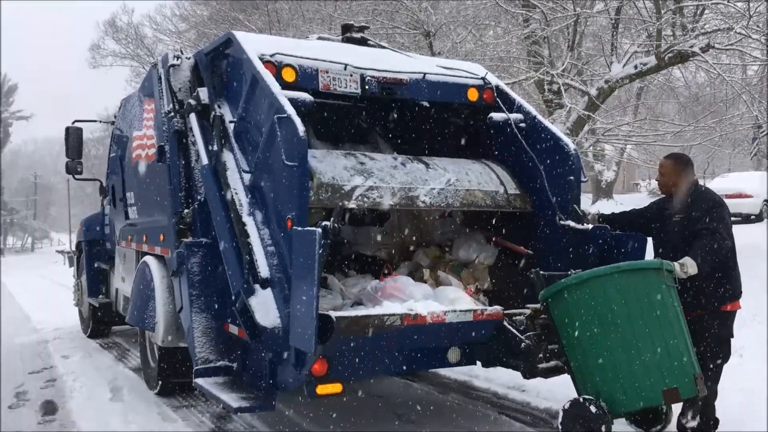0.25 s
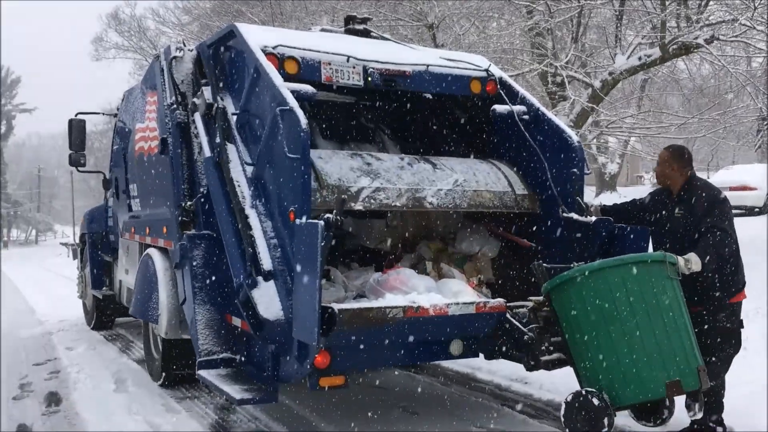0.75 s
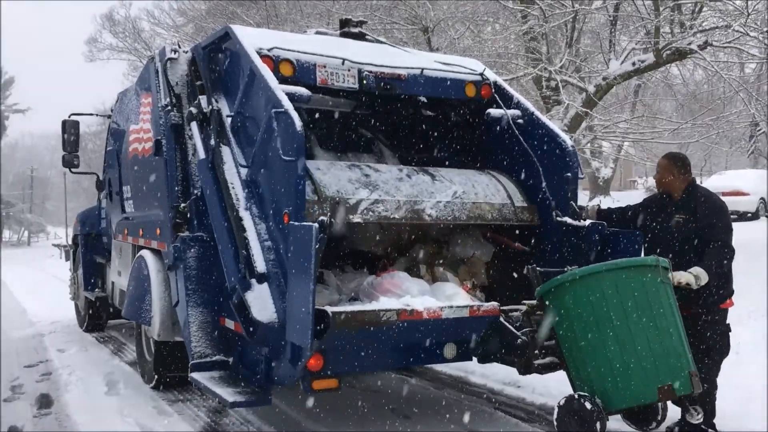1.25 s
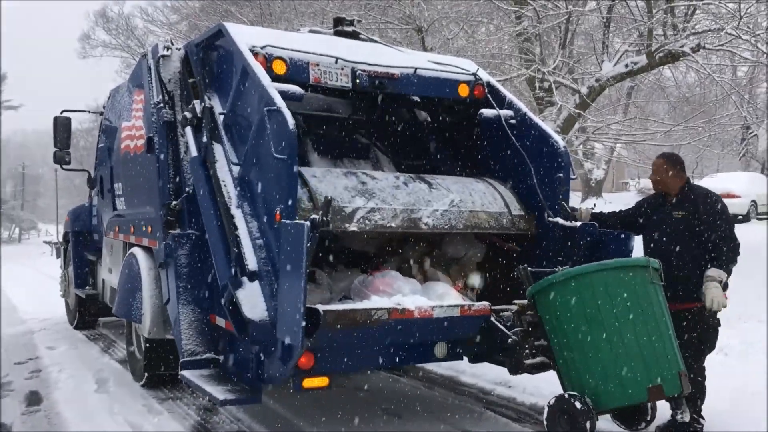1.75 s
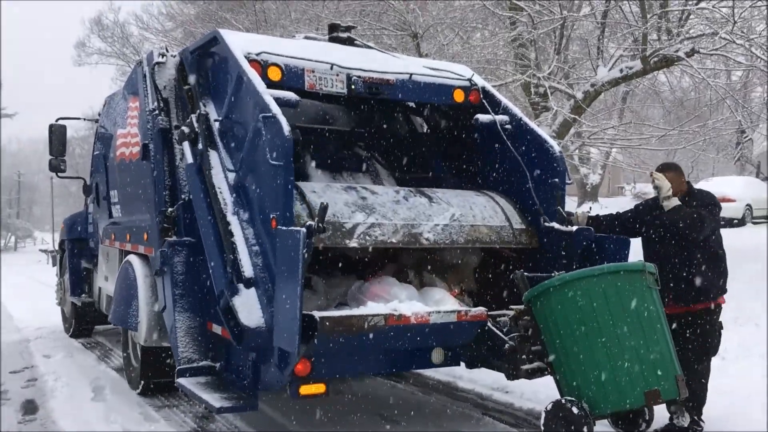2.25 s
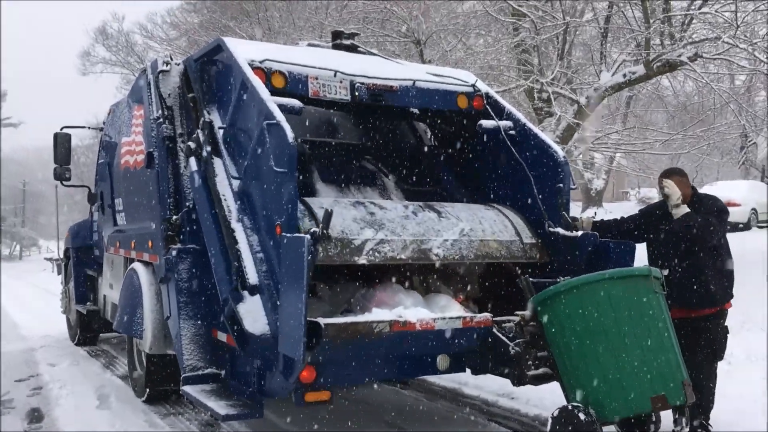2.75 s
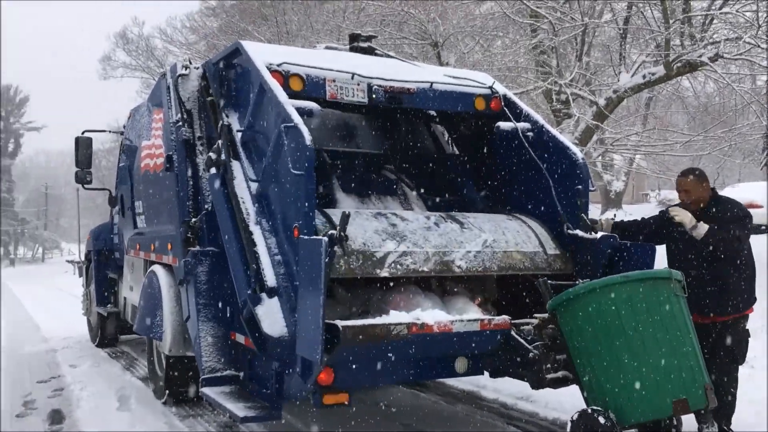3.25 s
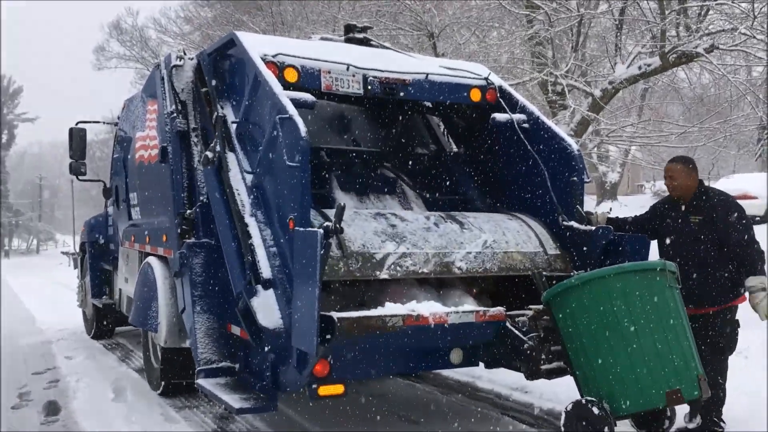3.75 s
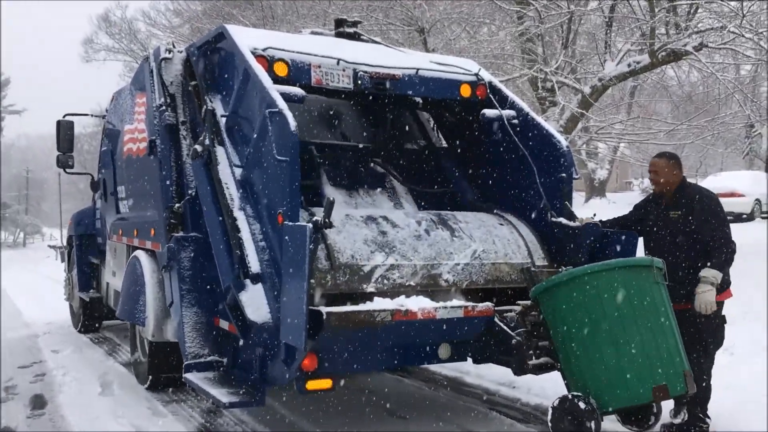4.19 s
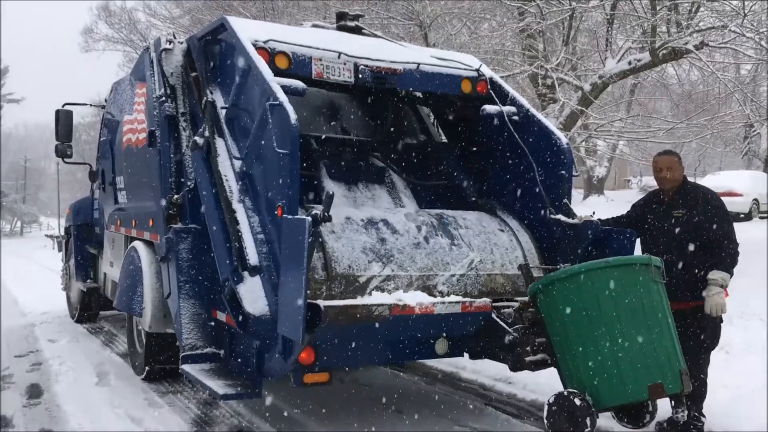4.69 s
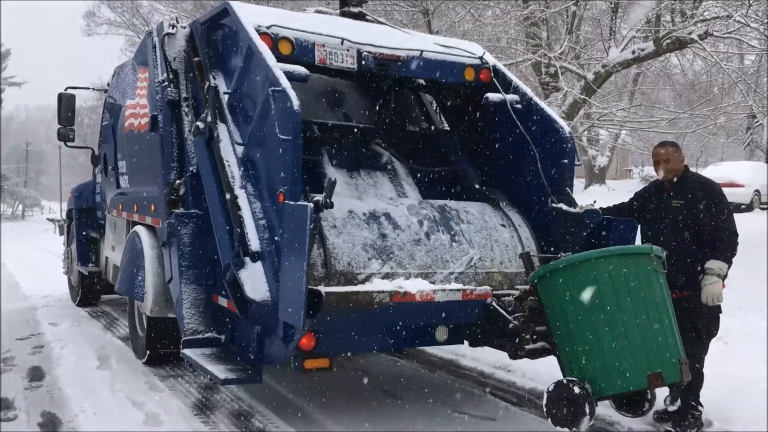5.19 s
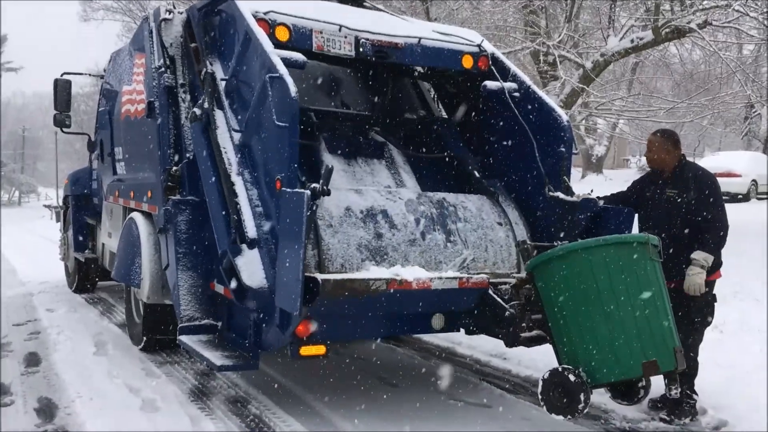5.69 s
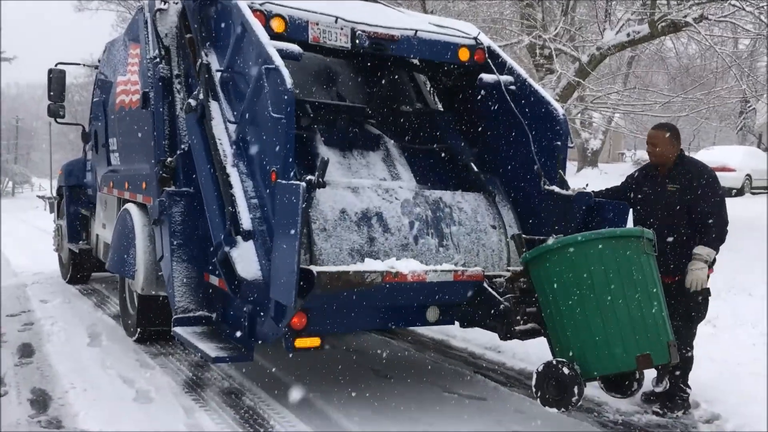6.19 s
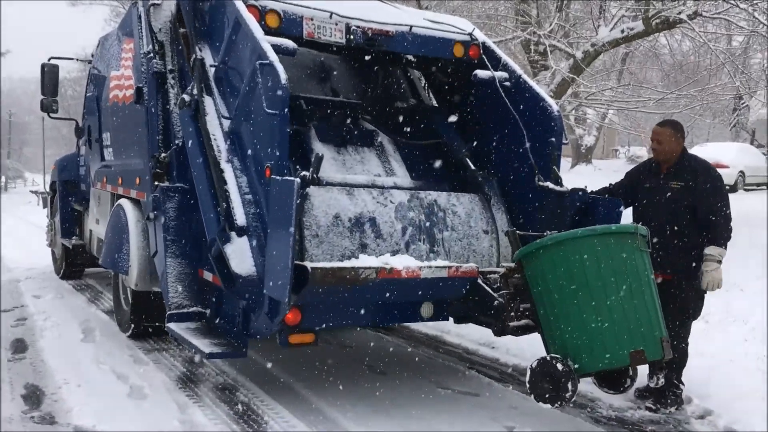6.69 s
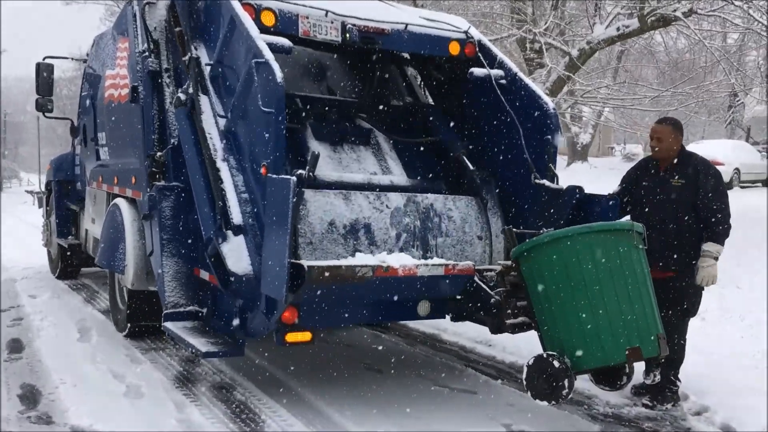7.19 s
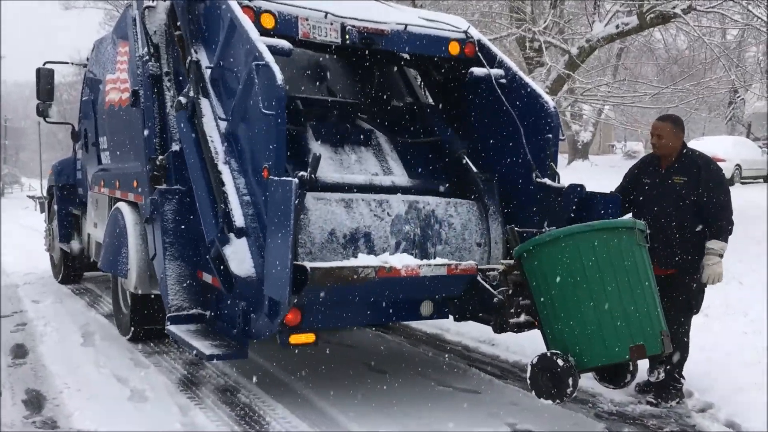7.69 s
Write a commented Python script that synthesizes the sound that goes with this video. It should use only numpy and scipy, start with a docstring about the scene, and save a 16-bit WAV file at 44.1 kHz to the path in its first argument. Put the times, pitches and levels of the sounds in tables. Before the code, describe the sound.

Loud refuse truck drone and pump whine; midway a heavy metallic slam and rubbish crunch, the pitch sinks to half, then recovers to steady packing.

```python
"""A six-cylinder refuse truck runs at raised speed, its gear pump driving the packer: pump whine from ripple
tones through body panels, exhaust and clatter from cycle tones and noise, valve hiss from pulsing noise.
Small bright ticks of filtered noise come and go. Near 4 s the blade slams: noise bursts crunch rubbish and
ring plates, decaying sines boom. The engine sags to half speed by 5 s, with spill jets (wandering noise bands)
and a falling turbo whistle (sine); the blade reverses, the engine climbs back and the packer goes on."""
import sys
import numpy as np
from scipy import signal
from scipy.fft import rfft, irfft, next_fast_len
from scipy.io import wavfile
from scipy.ndimage import uniform_filter1d

SR = 44100
rng = np.random.default_rng(int(sys.argv[2]) if len(sys.argv) > 2 else 0)


def master(y):
    """Save y as 16-bit WAV."""
    cut = np.clip(np.atleast_2d(y).T, -1, 1)
    pcm = np.round(cut * 32767)  # scale
    wavfile.write(sys.argv[1], SR, pcm.astype(np.int16))


N = 350154

# pump tooth rate before rounding: t/s, f/Hz
SPEED_CURVE = [(0.0, 281.2), (0.75, 281.7), (1.05, 283.0), (1.9, 282.6), (2.6, 282.4), (3.0, 282.6),
               (3.75, 281.9), (3.9, 282.0), (4.05, 277.5), (4.25, 232.9), (4.35, 227.3), (4.55, 198.4),
               (4.75, 166.5), (4.93, 149.0), (5.05, 147.4), (5.18, 148.7), (5.3, 172.5), (5.45, 210.0),
               (5.63, 270.5), (5.72, 282.0), (5.85, 287.9), (6.2, 288.5), (6.8, 289.0), (7.6, 288.5),
               (7.94, 288.7)]
# engine layers (exhaust, clatter, oil hiss): sliding level/dB, packing level/dB,
# loss per octave of speed/dB, gain coasting/dB, gain pulling/dB
LAYER_LOADS = [(-31, -33, 1, 4, 4), (-36, -38.5, 6, -4.5, 3.5), (-48, -47.5, 11, -17, 1.5)]
# ripple entering the steel body: t/s, tooth tone level/dB, its octave level/dB
RIPPLE_LEVELS = [(0.0, -32, -28.5), (0.1, -40.5, -29), (0.45, -26, -30.5), (0.78, -24, -33.5),
                 (1.0, -26.5, -32), (1.4, -20.5, -34), (2.6, -21.5, -34), (3.8, -26.5, -32.5),
                 (3.95, -20, -33), (4.1, -25.5, -49), (4.3, -18, -33), (4.42, -19, -41), (4.5, -20.5, -36),
                 (4.57, -17, -32.5), (4.66, -20.5, -34.5), (4.75, -17.5, -36), (4.82, -16.5, -38),
                 (4.89, -15, -39.5), (5.0, -20.5, -34), (5.16, -14.5, -38.5), (5.22, -14.5, -36),
                 (5.32, -20, -34.5), (5.39, -17.5, -29), (5.46, -18.5, -36), (5.53, -19, -43),
                 (5.6, -18.5, -48), (5.68, -20.5, -43), (5.74, -21.5, -31), (5.9, -22, -30),
                 (7.94, -21, -30.5)]
# body panels; negative gain swings against the others: f/Hz, width/Hz, gain
BODY_PANELS = [(151, 6.4, 0.8), (164.5, 2.4, -1.1), (171.7, 1.6, -0.68), (187.3, 13, 0.95),
               (206.2, 2.4, -1.3), (221.5, 4.8, 1.33), (242, 5.3, 1.1), (265, 4.3, 0.8),
               (277.14, 4.1, -1.02), (292.16, 7.1, -1.33), (348, 7.2, -1.04), (359, 2.4, 1.6),
               (387, 1.6, 0.87), (432, 74, 0.89)]
# tones swelling as the glide crosses body resonances: t/s, drive gear level/dB, third overtone level/dB
GEAR_LEVELS = [(0.0, -44, -65), (3.9, -43, -75), (4.2, -54, -60), (4.4, -48, -49), (4.48, -41, -46),
               (4.6, -50, -49), (4.72, -42, -51), (4.83, -43, -59), (4.9, -58, -51), (5.04, -56, -51),
               (5.15, -54, -51), (5.2, -59, -44), (5.26, -36, -62), (5.33, -41, -62), (5.4, -45, -62),
               (5.65, -46, -50), (5.8, -40, -45), (5.9, -43, -47), (6.6, -45, -57), (7.94, -44.5, -75)]
# overtones that stand out at the lowest speed: multiple of tooth rate, level there/dB
SLOW_OVERTONES = [(4, -45)]
# upper overtones, sliding: multiple of tooth rate, level before SLIDE_OFFSET_DB/dB
SLIDE_OVERTONES = [(3, -27.5), (4, -27), (5, -24.5), (6, -37), (7, -33), (8, -30), (9, -34.5), (10, -30.5),
                   (11, -35), (12, -25), (13, -47), (14, -46), (15, -45), (16, -43), (17, -54), (18, -49),
                   (19, -50), (20, -53)]
# upper overtones, packing: multiple of tooth rate, level before PACK_OFFSET_DB/dB
PACK_OVERTONES = [(3, -38), (4, -31), (5, -30.5), (6, -41), (7, -38), (8, -29.5), (9, -42), (10, -39.5),
                  (11, -31), (12, -30.5), (13, -44), (14, -49), (15, -40), (16, -46), (17, -50), (18, -49),
                  (19, -52), (20, -49)]
# cycle tones over the exhaust level: multiple of two-turn cycle, sliding level/dB, packing level/dB
FIRING_TONES = [(4, -16, -17), (5, -24, -18), (6, -1.5, -0.5), (8, -12, -9), (9, -16, -5), (10, -19, -13),
                (11, -24, -15), (12, -8, -6.5), (13, -17, -16), (14, -17, -14), (16, -24, -14),
                (17, -19, -28), (18, -12, -19), (20, -18, -26)]
# block knock over the clatter level: multiple of two-turn cycle, sliding level/dB, packing level/dB
KNOCK_TONES = [(30, -19, -25), (54, -20, -28), (78, -25, -15), (81, -14, -21), (84, -24, -13),
               (86, -15, -28), (87, -20, -28), (90, -21, -24), (92, -21, -14), (99, -26, -18),
               (102, -16, -22), (108, -21, -19), (110, -19, -16), (112, -17, -20), (114, -25, -20),
               (123, -28, -19), (125, -18, -28), (129, -20, -21), (138, -30, -21), (144, -30, -19),
               (134, -34, -24), (163, -34, -23), (173, -34, -25), (217.3, -24, -38), (230, -40, -30),
               (239.5, -26, -40), (269, -27, -38)]
# exhaust rumble spectrum: f/Hz, relative level per Hz/dB
EXHAUST_SPECTRUM = [(15, -49), (25, -14), (48, -3), (73, 4), (120, 1), (227, -6), (281, -3.5), (311, -23),
                    (339, -3), (420, -29), (500, -8.5), (650, -70), (1100, -120)]
# diesel clatter spectrum: f/Hz, relative level per Hz/dB
CLATTER_SPECTRUM = [(180, -38), (300, -5.5), (341, -21.5), (422, -15), (464, -16.5), (516, -17.5),
                    (566, -8), (734, -18), (997, -13.5), (1350, -14.5), (1530, -16.5), (1620, -21),
                    (1750, -18), (2410, -22), (2620, -21), (2950, -24), (3350, -21), (3640, -33),
                    (5000, -38.5), (6500, -89), (11000, -120)]
# valve hiss spectrum, sliding: f/Hz, relative level per Hz/dB
SLIDE_HISS_SPECTRUM = [(2060, -34), (3500, -9.5), (3610, -8), (4630, -7.5), (4870, -14), (5640, -14.5),
                       (6440, -8), (7850, -16.5), (9380, -9.5), (10300, -19.5), (12600, -6.5),
                       (15100, -16.5), (16000, -26)]
# valve hiss spectrum, packing: f/Hz, relative level per Hz/dB
PACK_HISS_SPECTRUM = [(2060, 3.5), (3500, -5.5), (3590, -22), (3710, -5), (4180, -1), (4970, -10.5),
                      (5930, -2.5), (7850, -10), (9260, -4.5), (10500, -14), (12600, -1.5), (14800, -14),
                      (16000, -9)]
# oil spilling over the valve: t/s, closing level/dB, opening level/dB, relief level/dB
SPILL_LEVELS = [(4.0, -92, -74, -78), (4.15, -61, -79, -64), (4.26, -60, -72, -48), (4.34, -64, -66, -53),
                (4.42, -64.5, -70, -53), (4.7, -62.5, -69, -56), (5.0, -65.5, -62, -70),
                (5.3, -67, -62, -59), (5.5, -70, -59, -63), (5.75, -89, -74, -80), (5.9, -98, -94, -90)]
# jets of the closing valve: f/Hz, width/Hz, level over spill/dB
CLOSING_JETS = [(9520, 750, 7), (12200, 2800, 3.5), (14500, 2500, -1)]
# jets of the opening valve: f/Hz, width/Hz, level over spill/dB
OPENING_JETS = [(6200, 520, -1), (4260, 420, 1), (11600, 1000, 2)]
# street hush spectrum: f/Hz, relative level per Hz/dB
STREET_SPECTRUM = [(2000, -4), (3000, 0), (5000, 0.5), (8000, -0.5), (16000, -2)]
# bright ticks: t/s, click level/dB, ring level/dB, ring t60/s
TICK_TIMES = [(0.06, -34, -40, 0.073), (0.425, -31, -52, 0.05), (0.4805, -31, -44, 0.09),
              (0.591, -30, -52, 0.05), (1.027, -36, -46, 0.27), (4.205, -50, -52, 0.08),
              (5.045, -48, -57, 0.05)]
# jingle bands: f/Hz, width/Hz, relative level/dB
TICK_BANDS = [(7190, 330, -0.5), (12800, 500, -6), (14200, 550, 4)]
# blows on the hopper: t/s, crunch level/dB, rise/s, crunch t60/s, ring level/dB, struck plates f/Hz, rumble level/dB
HOPPER_BLOWS = [(3.868, -20.5, 0.0064, 0.13, -51, 2720, -10), (3.921, -20, 0.0098, 0.19, -52, 5300, -36),
                (3.9533, -8.5, 0.002, 0.084, -39.5, 1670, -35), (3.994, -25, .005, 0.13, -61, 1400, -42),
                (4.019, 0, 0.023, 0.12, -59, 1400, -32), (4.042, -24, 0.0025, .08, -49, 1500, -26),
                (4.086, -6.5, 0.013, 0.048, -63, 2600, -25), (4.122, -36, 0.0078, .15, -71, 1520, -38),
                (4.151, -32, 0.0023, 0.18, -68, 3000, -34), (4.177, -41, 0.0034, 0.086, -63, 3200, -26),
                (4.207, -36, .0008, .06, -47, 680, -22), (4.256, -46, .004, .2, -67, 3100, -52)]
# crunching rubbish spectrum: f/Hz, relative level per Hz/dB
CRUNCH_SPECTRUM = [(120, 1.5), (200, -4), (283, -6), (347, -25), (735, -11.5), (883, -16), (1250, -14.5),
                   (3370, -21), (4950, -22), (9230, -24), (16000, -24.5)]
# hopper plate modes: f/Hz, relative level/dB, t60/s
PLATE_MODES = [(570, -4, .1), (800, -7, .08), (1050, -5, .06), (1270, -1, .065), (1420, -2, .07),
               (1728, -5, .05), (1960, -3, .04), (2250, -4, .035), (2560, -2, .03), (2960, 1, .035),
               (3310, 2, .035), (3900, -3, .02), (4400, -5, .02), (5300, -2, .02), (6300, -8, .02)]
# body booms: t/s, level/dB, f/Hz, rise/s, t60/s
BODY_BOOMS = [(3.8775, 4.5, 119, 0.0039, 0.088), (3.879, -10, 53, 0.0064, 0.39),
              (3.887, -11, 159, 0.0063, 0.32), (3.93, -16, 105.4, 0.0054, 0.39),
              (4.059, -11.5, 84.5, 0.0058, 0.38), (4.165, -10.5, 98, 0.0075, 0.38),
              (4.183, 13.5, 59, 0.032, 0.16), (4.258, -0.5, 52.7, 0.0068, 0.15),
              (4.31, -21, 78.8, 0.0061, 0.52)]
# turbocharger whistle: t/s, f/Hz, level/dB
WHISTLE_CURVE = [(4.5, 6620, -90), (4.56, 6560, -69), (4.61, 6520, -67), (4.66, 6460, -76),
                 (4.74, 6380, -65), (4.83, 6260, -66), (4.87, 6220, -78), (4.95, 6150, -72),
                 (5.02, 6100, -90)]

STEP_SAMPLES = 64  # between level values
SWITCH_S = 5.0  # valve reverses the blade
TEETH_PER_CYCLE, GEAR_RATIO = 23.42, 22 / 13
FLYWHEEL_S, HUNT_SHARE = .05, .0005  # rounding of speed changes; spread of speed wander
COAST_HZ_PER_S, PULL_HZ_PER_S = 72, 530  # change of tooth rate at full coasting, pulling
SAG_DB_PER_OCTAVE = 12  # tones lost as speed falls
DIRECT_GAIN = -0.52  # ripple straight from the pump
SETTLE_S = .2  # window over which a glide is felt
BLUR_TURNS_PER_HZ_S = 0.00045  # tooth timing scatter
FLUTTER_DB, GLIDE_LOSS_DB, LOW_GLIDE_LOSS_DB = 3.2, 1.5, 5.0  # octave waver, upper and low loss per 100 Hz/s
LOW_FADE_DB_PER_OCTAVE = 50  # above the lowest speed
SLIDE_OFFSET_DB, PACK_OFFSET_DB = 10, 17  # overtone levels raised over the clatter
REPEAT_TOP_HZ, REPEAT_SHARE = 3200, .55  # clatter repeats below this; its power share
RELIEF_HZ, RELIEF_WIDTH_HZ = 3240, 310
JET_DRIFT_SHARE, JET_FLICKER_DB = .008, 2.2  # spread of pitch wander, of sputter
STREET_DB = -59.5
CLICK_HZ, CLICK_T60_S = 13700, 0.015
TAIL_DB, TAIL_T60_S = -17, 0.094  # loose rubbish scraping on
REACH_DB_PER_OCTAVE = 10  # ring lost away from the struck plates
TOP_HZ = 15800


def undb(db):
    """Gain of a level in dB."""
    return 10 ** (np.asarray(db) / 20)


def unit(x):
    """Scaled to rms 1."""
    return x / np.sqrt(np.mean(x ** 2))


def curves(table):
    """Each column joined by straight lines in time."""
    s, *columns = np.transpose(table)
    return [np.interp(np.arange(N) / SR, s, c) for c in columns]


def colour(x, spectrum):
    """Shapes a white sound to a spectrum; rms 1."""
    hz, db = np.transpose(spectrum)
    size = next_fast_len(N)
    log_hz = np.log(np.arange(size // 2 + 1) * SR / size + 1)
    gain = undb(np.interp(log_hz, np.log(hz), db, -120, -120))
    return unit(irfft(rfft(x, size) * gain, size)[:N])


def band(x, hz, width_hz):
    """One resonance."""
    return signal.lfilter(*signal.iirpeak(hz, hz / width_hz, SR), x)


def walk(rate_hz):
    """Random levels held about 1 / rate_hz and slewed twice; spread 1."""
    k = int(SR / STEP_SAMPLES / rate_hz)
    held = np.repeat(rng.standard_normal(N // STEP_SAMPLES // k + 2), k)
    coarse = uniform_filter1d(uniform_filter1d(held, k), k)
    return np.interp(np.arange(N) / STEP_SAMPLES, np.arange(len(coarse)), unit(coarse))


def tone(turns, db):
    """A sine on a running count of turns, at a slowly changing rms level."""
    gain = np.repeat(np.sqrt(2) * undb(db[::STEP_SAMPLES]), STEP_SAMPLES)[:N]
    phase = ((turns + rng.random()) % 1).astype(np.float32)
    return uniform_filter1d(gain, STEP_SAMPLES) * np.sin(2 * np.pi * phase)


def fall(t, rise_s, t60_s):
    """Envelope over the time since a blow: a soft rise, then decay."""
    t = np.maximum(t, 0)
    return (1 - np.exp(-t / rise_s)) ** 2 * np.exp(-np.log(1000) * t / t60_s)


def load(hz, packing):
    """Level of each engine layer: drops with falling speed, shifts while the engine coasts or pulls."""
    change = uniform_filter1d(np.gradient(hz) * SR, SR // 10)
    coast = np.clip(-change / COAST_HZ_PER_S, 0, 1)
    pull = np.clip(change / PULL_HZ_PER_S, 0, 1)
    octaves = np.log2(hz / hz.max())
    return [np.where(packing, pack, slide) + lost * octaves + coast_db * coast + pull_db * pull
            for slide, pack, lost, coast_db, pull_db in LAYER_LOADS]


def pump(hz, teeth, packing, sag_db, clatter_db):
    """Pressure ripple at the tooth rate; the overtones change when the valve reverses the blade."""
    tooth_db, octave_db = curves(RIPPLE_LEVELS)
    window = int(SETTLE_S * SR)
    glide = uniform_filter1d(np.abs(np.gradient(hz)) * SR, window, origin=window // 4)
    # a gliding shaft runs unevenly, blurring high overtones most
    uneven = teeth + BLUR_TURNS_PER_HZ_S * glide * walk(45)
    ripple = tone(teeth, tooth_db)
    ripple += tone(teeth + uneven, octave_db + FLUTTER_DB * glide / 100 * walk(24))
    # panels swell as the tone crosses them and ring on, beating against it
    out = DIRECT_GAIN * ripple + sum(gain * band(ripple, f, width) for f, width, gain in BODY_PANELS)
    gear_db, third_db = curves(GEAR_LEVELS)
    out += tone(GEAR_RATIO * uneven, gear_db + 1.2 * walk(8))
    out += tone(2 * teeth + uneven, third_db + 1.2 * walk(12))
    for k, db in SLOW_OVERTONES:
        fade_db = LOW_FADE_DB_PER_OCTAVE * np.log2(hz / hz.min())
        out += tone(k * uneven, db - fade_db - LOW_GLIDE_LOSS_DB * glide / 100)
    for (k, slide), (_, pack) in zip(SLIDE_OVERTONES, PACK_OVERTONES):
        db = np.where(packing, pack + PACK_OFFSET_DB, slide + SLIDE_OFFSET_DB) - GLIDE_LOSS_DB * glide / 100
        out += tone(k * uneven, clatter_db + sag_db + db + 2.2 * walk(10))
    return out


def cycle_tones(table, cycle, packing, sag_db):
    """Steady tones at multiples of the two-turn cycle."""
    return sum(tone(k * cycle, np.where(packing, pack, slide) + sag_db + .9 * walk(6))
               for k, slide, pack in table)


def engine(cycle, packing, sag_db, exhaust_db, clatter_db):
    """Six firings a cycle; much of the low clatter repeats every cycle and swells at each firing."""
    boom = cycle_tones(FIRING_TONES, cycle, packing, sag_db)
    knock = cycle_tones(KNOCK_TONES, cycle, packing, sag_db)
    rumble = undb(-6.0) * colour(rng.standard_normal(N), EXHAUST_SPECTRUM)
    size = 3700  # points per cycle
    pattern = np.interp(cycle % 1 * size, np.arange(size + 1), rng.standard_normal(size + 1))
    cylinder_db = np.array([1.0, -0.76, 0.55, 0.73, -1.1, -0.11])[(6 * cycle % 6).astype(int)]
    swell = undb(cylinder_db) * (1 + 0.57 * np.exp(-(6 * cycle % 1) / 0.068))
    loose = rng.standard_normal(N)
    # below REPEAT_TOP_HZ the pattern replaces part of the loose noise
    repeats = np.sqrt(REPEAT_SHARE) * unit(pattern) + (np.sqrt(1 - REPEAT_SHARE) - 1) * loose
    below = signal.butter(2, REPEAT_TOP_HZ, fs=SR, output="sos")
    clatter = colour(swell * (loose + signal.sosfiltfilt(below, repeats)), CLATTER_SPECTRUM)
    return undb(exhaust_db) * (boom + rumble) + undb(clatter_db) * (knock + undb(-0.64) * clatter)


def jet(hz, width_hz):
    """A narrow band of noise whose centre wanders."""
    turn = np.exp(2j * np.pi * np.cumsum(hz * (1 + JET_DRIFT_SHARE * walk(22))) / SR)
    lowpass = signal.butter(2, width_hz / 2, fs=SR, output="sos")
    slow = signal.sosfilt(lowpass, rng.standard_normal((2, N)))
    return unit(slow[0] * turn.real + slow[1] * turn.imag)


def oil(cycle, packing, hiss_db):
    """Broad hiss that pulses with the engine cycle, and sputtering jets while oil spills over the valve."""
    pulse = 1 + .25 * np.sin(2 * np.pi * cycle)
    flow = pulse * undb(.6 * walk(20)) * rng.standard_normal(N)
    hiss = np.where(packing, colour(flow, PACK_HISS_SPECTRUM), colour(flow, SLIDE_HISS_SPECTRUM))
    out = undb(hiss_db) * hiss
    relief = [(RELIEF_HZ, RELIEF_WIDTH_HZ, 0)]
    for bands, spill_db in zip((CLOSING_JETS, OPENING_JETS, relief), curves(SPILL_LEVELS)):
        for hz, width, db in bands:
            out += undb(spill_db + db + JET_FLICKER_DB * walk(45)) * jet(hz, width)
    return out


def street():
    """Steady hush of coloured noise."""
    return undb(STREET_DB) * colour(rng.standard_normal(N), STREET_SPECTRUM)


def ticks():
    """A thin bright click with a faint narrow jingle, both from one noise burst."""
    out, t = np.zeros(N), np.arange(SR // 10) / SR
    for s, db, ring_db, t60 in TICK_TIMES:
        noise = rng.standard_normal(len(t))
        ring = sum(undb(d) * unit(band(band(noise, hz, width), hz, width)) for hz, width, d in TICK_BANDS)
        click = undb(db) * fall(t, 0.00047, CLICK_T60_S) * unit(band(noise, CLICK_HZ, 5000))
        start = int(s * SR)
        out[start:start + len(t)] += click + undb(ring_db) * fall(t, 0.0012, t60) * ring
    return out


def blows():
    """Each blow crunches rubbish, rumbles in the load and rings the plates near where it lands; the body booms."""
    span = slice(int(HOPPER_BLOWS[0][0] * SR) - 99, int(HOPPER_BLOWS[-1][0] * SR) + SR)
    grain_db = 1.8 * rng.exponential(size=N) + 0.73 * walk(340)
    grit = colour(rng.standard_normal(N) * undb(grain_db), CRUNCH_SPECTRUM)[span]
    thud = unit(band(band(rng.standard_normal(N), 174, 136), 200, 550))[span]
    t, out = np.arange(N)[span] / SR, np.zeros(N)
    for s, db, rise, t60, _, _, rumble_db in HOPPER_BLOWS:
        tail = undb(TAIL_DB) * fall(t - s, rise, TAIL_T60_S) * min(1, 0.0028 / rise)
        out[span] += undb(db) * (fall(t - s, rise, t60) + tail) * grit
        out[span] += undb(rumble_db) * fall(t - s, 0.0035, 0.47) * thud
    for s, db, hz, rise, t60 in BODY_BOOMS:
        out[span] += undb(db) * fall(t - s, rise, t60) * np.sin(2 * np.pi * hz * (t - s))
    pushes = [fall(t - row[0], 0.0021, 0.2) for row in HOPPER_BLOWS]
    for hz, db, t60 in PLATE_MODES:
        push = sum(undb(row[4] - REACH_DB_PER_OCTAVE * abs(np.log2(hz / row[5]))) * p
                   for row, p in zip(HOPPER_BLOWS, pushes))
        pole = np.exp(2j * np.pi * hz / SR - np.log(1000) / (t60 * SR))
        out[span] += undb(db) * signal.lfilter([1], [1, -pole], push * rng.standard_normal(len(t))).imag
    return out


def turbo():
    """A faint turbocharger whistle, its pitch falling as the engine sags."""
    hz, db = curves(WHISTLE_CURVE)
    return tone(np.cumsum(hz) / SR, db + 1.5 * walk(30))


def scene():
    """All sources summed to one channel; pump and engine share one speed."""
    hz = uniform_filter1d(curves(SPEED_CURVE)[0], int(FLYWHEEL_S * SR)) * (1 + HUNT_SHARE * walk(6))
    teeth = np.cumsum(hz) / SR
    cycle = teeth / TEETH_PER_CYCLE
    packing = np.arange(N) / SR > SWITCH_S
    exhaust_db, clatter_db, hiss_db = load(hz, packing)
    sag_db = SAG_DB_PER_OCTAVE * np.log2(hz / hz.max())
    out = pump(hz, teeth, packing, sag_db, clatter_db)
    out += engine(cycle, packing, sag_db, exhaust_db, clatter_db)
    out += oil(cycle, packing, hiss_db) + street()
    return (out + ticks() + blows() + turbo())[None]


def record(dry):
    """The microphone rounds the loudest peaks and cuts the top."""
    rounded = np.tanh(0.78 * dry) / 0.78
    return signal.sosfilt(signal.ellip(12, .2, 90, TOP_HZ, fs=SR, output="sos"), rounded)


dry = scene()
out = record(dry)
master(out)
```